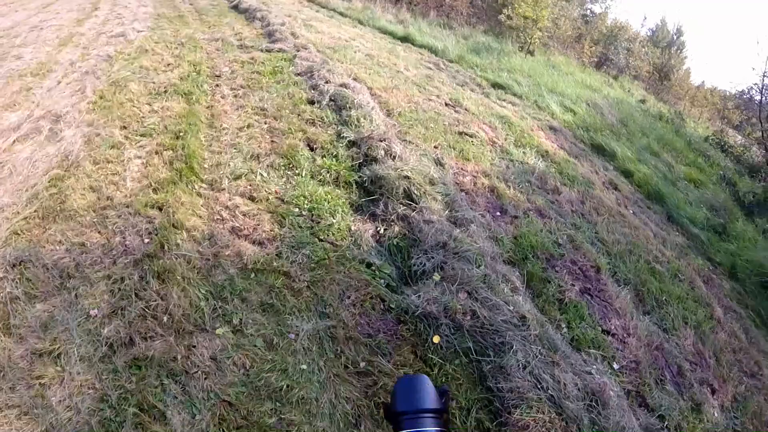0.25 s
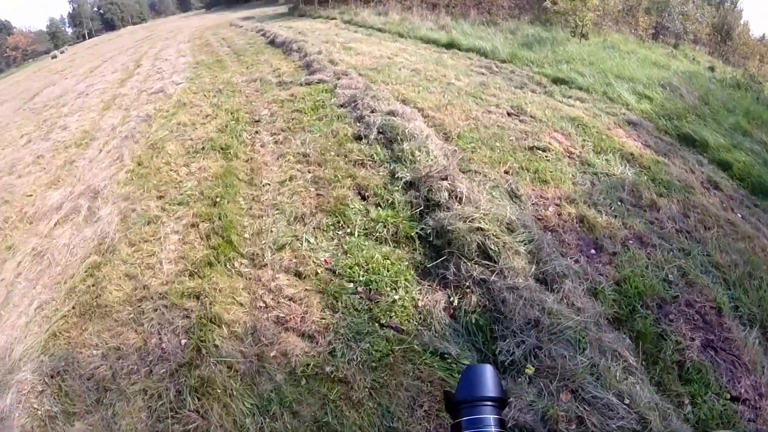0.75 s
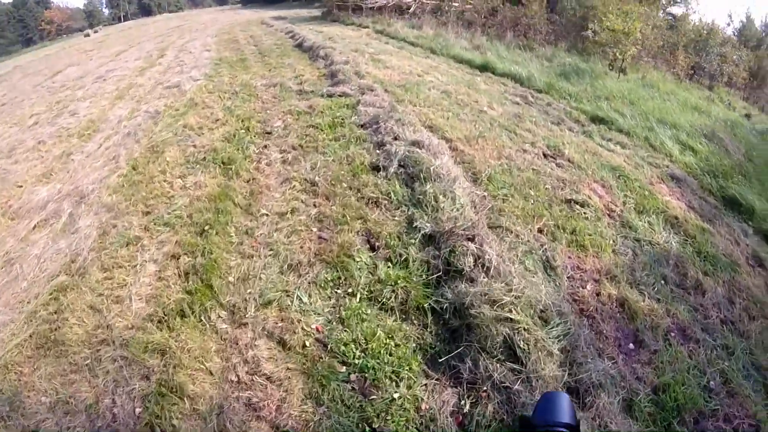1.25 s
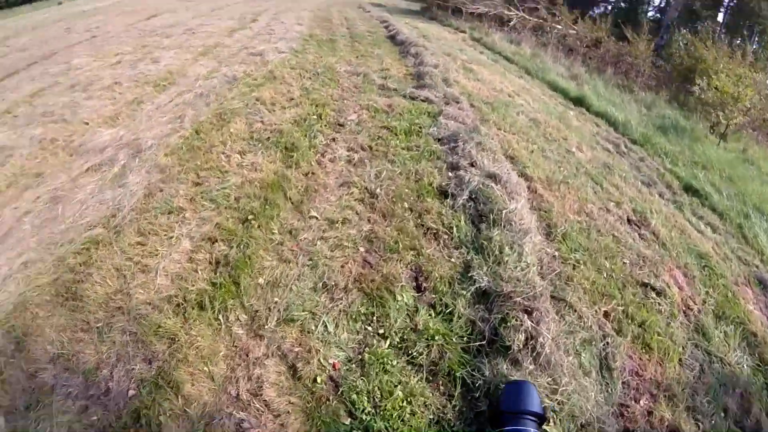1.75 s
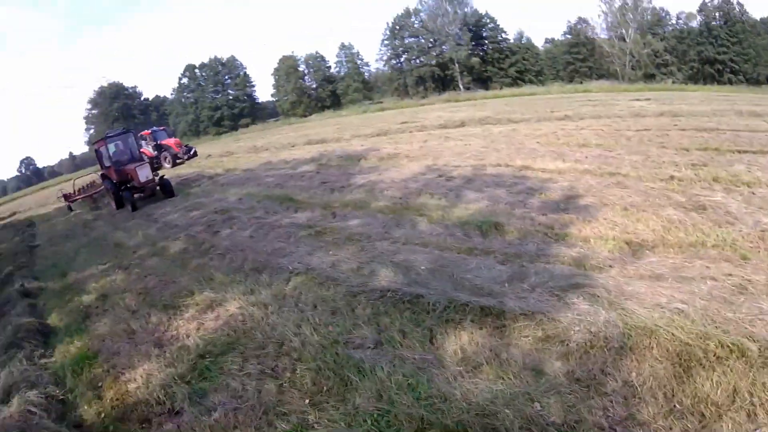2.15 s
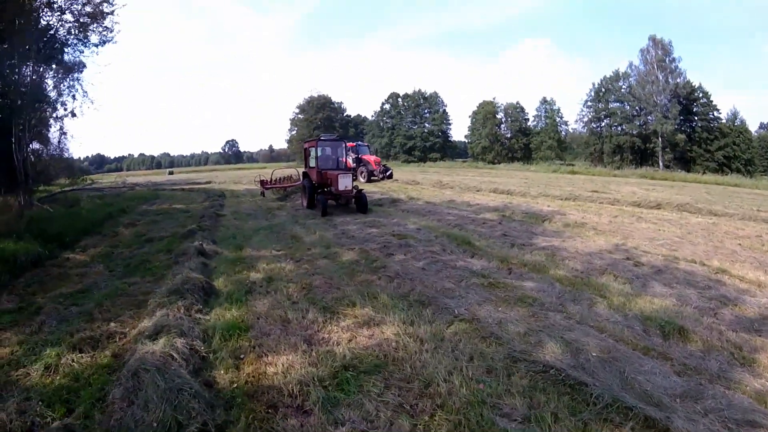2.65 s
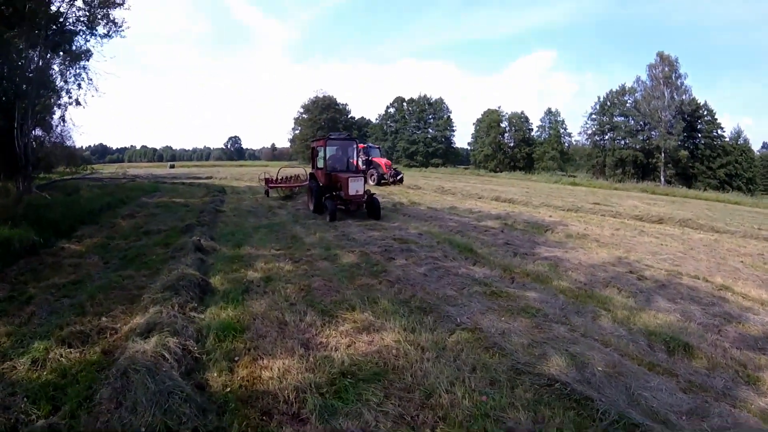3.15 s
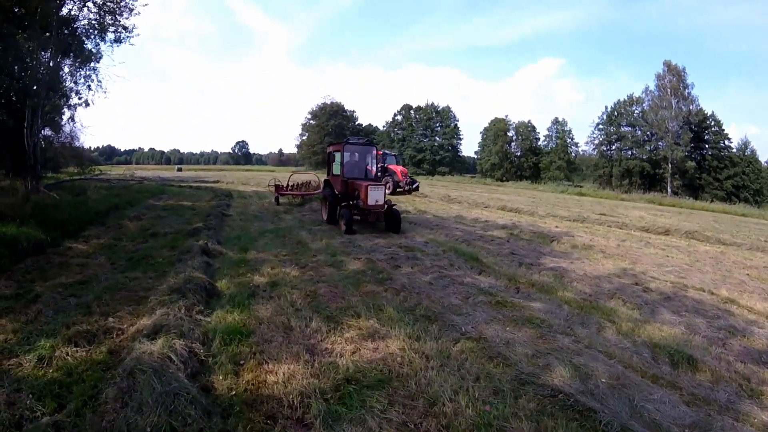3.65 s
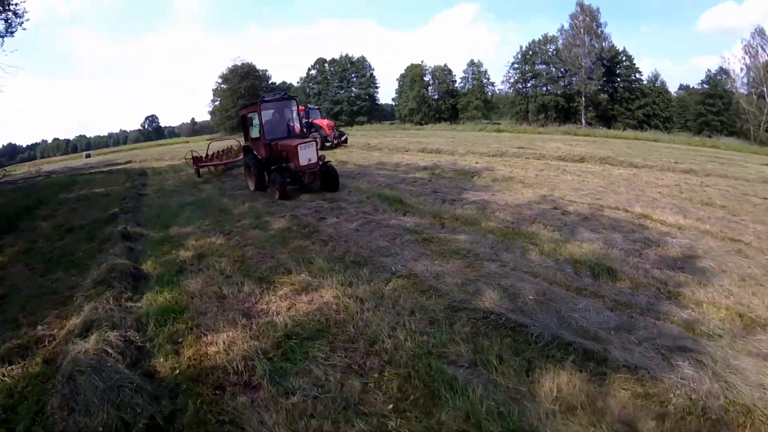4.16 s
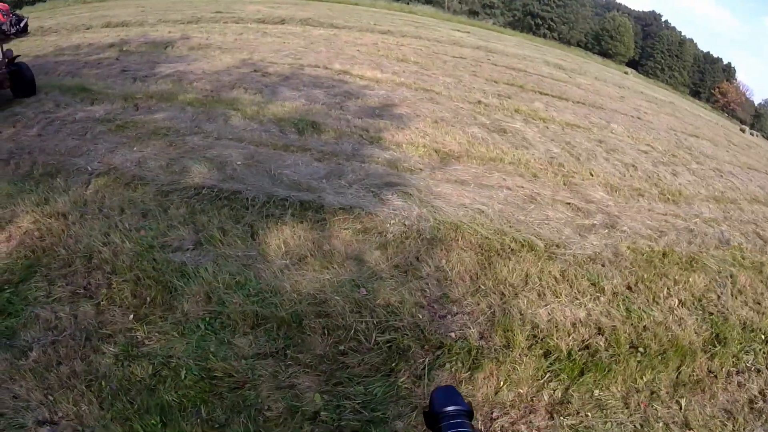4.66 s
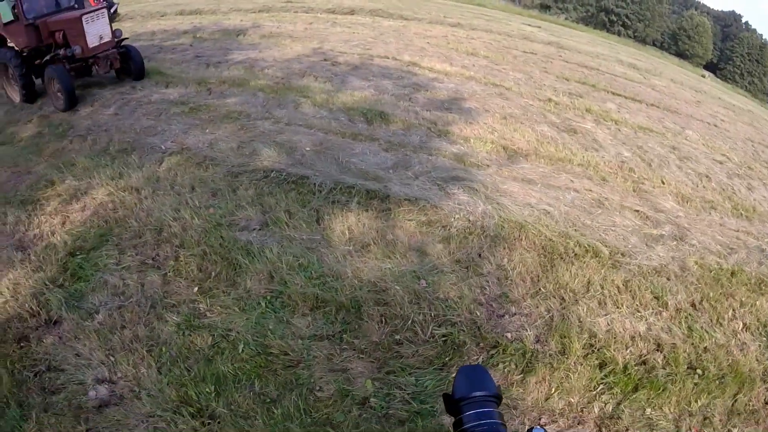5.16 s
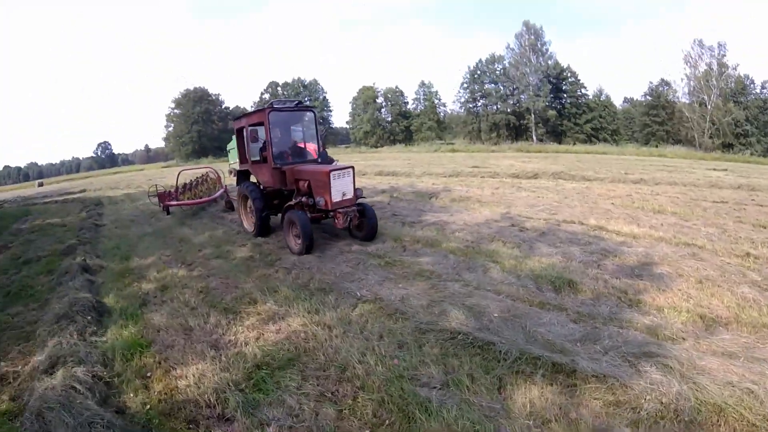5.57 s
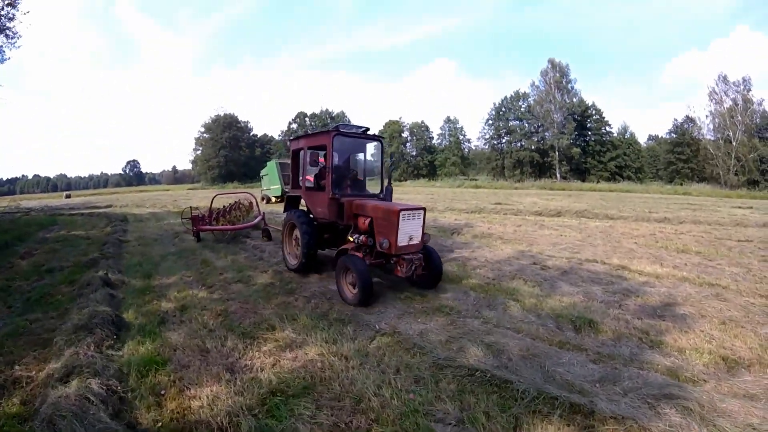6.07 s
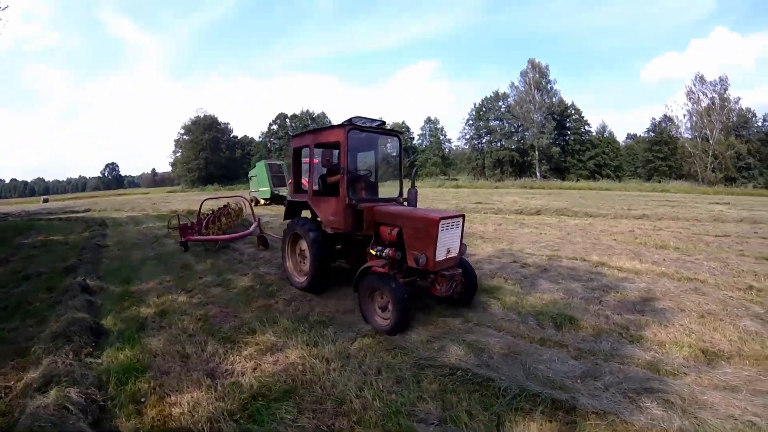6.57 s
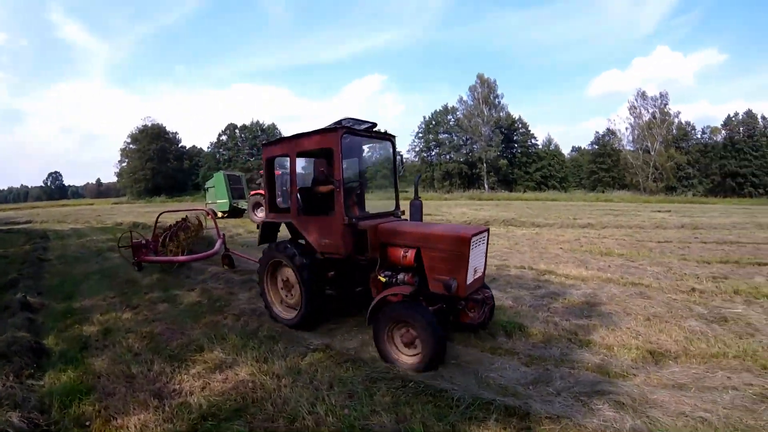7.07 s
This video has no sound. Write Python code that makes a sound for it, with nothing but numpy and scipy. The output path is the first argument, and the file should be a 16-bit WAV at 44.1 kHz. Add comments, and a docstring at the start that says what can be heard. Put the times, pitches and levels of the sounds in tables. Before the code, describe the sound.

Low wind rumble batters a small outdoor microphone, nearly mono and dry. Beneath it an old tractor knocks in a fast limping rhythm: two strong blows close together, then a weaker gap. Hollow block ringing, rattling tinwork, gears and valve ticking join dull exhaust thuds. The engine comes nearer, loudest in the last second, while gusts swell. A short soft hiss comes around three seconds, a fainter one after four.

```python
"""The knocking of an old two-cylinder diesel tractor grows nearer across a meadow, under buffeting wind.
The cylinders fire about a quarter cycle apart: two strong knocks ring the block by modal resonance, two strong
puffs excite the exhaust pipe, then comes a pause with weaker ones. Tinwork, gears and valves rattle as
modulated noise, air hisses out twice, and turbulence rumbles and flutters at a nearly mono microphone."""
import sys
import numpy as np
from scipy import signal
from scipy.fft import rfft, irfft, next_fast_len
from scipy.io import wavfile

SR = 44100
rng = np.random.default_rng(int(sys.argv[2]) if len(sys.argv) > 2 else 0)


def inscribe(sig):
    """Save sig as 16-bit PCM at rate SR to the path in sys.argv[1].

    A 1-D sig is mono; a 2-D sig holds one channel per row.
    Samples are clipped to [-1, 1] before scaling.
    """
    pcm = np.round(np.clip(np.atleast_2d(sig).T, -1, 1) * 32767)
    wavfile.write(sys.argv[1], SR, pcm.astype(np.int16))


N = 322795  # samples

# engine speed: start_s [s], cycle_rate_hz [four-stroke cycles per s]
ENGINE_SPEED = [(0.0, 9.836), (0.73, 9.18), (1.46, 8.546), (2.2, 8.709), (2.93, 8.841), (3.66, 8.82),
                (4.39, 8.944), (5.12, 9.119), (5.86, 9.059), (6.59, 9.432), (7.32, 9.485)]
START_CYCLE = 0.277  # cycles already turned at the start


def crank_cycle():
    """Phase is the time integral of frequency: four-stroke cycles turned so far."""
    return START_CYCLE + np.cumsum(curves(ENGINE_SPEED)[0]) / SR


# engine at the microphone as it nears: start_s [s], block_db [dB], treble_db [dB, base of the treble parts]
ENGINE_LEVEL = [(0, -29, -47), (.7, -29.5, -49.5), (1.4, -29.5, -46.5), (2.05, -30.5, -47.5),
                (2.4, -26, -50), (3.0, -25.5, -48.5), (3.6, -24, -48.5), (4.2, -23.5, -46.5),
                (4.5, -24, -49.5), (4.9, -23.5, -45), (5.85, -26, -48.5), (6.2, -23, -48), (6.67, -19, -42),
                (6.95, -22.5, -44.5), (7.1, -19.5, -40.5), (7.32, -22.5, -42.5)]
# blows in each cycle, over the running noise: place [cycle 0-1], block_db, tinwork_and_gears_db, valves_db [dB]
CYLINDER_BLOWS = [(.735, 9.5, 4, 6.5), (0.03, 6.5, 9, 9.5), (.54, 3, 0, -11), (0.4, 1, 2, -20),
                  (.83, 0, 8.5, -12)]
# spectrum of the block: pitch_hz [Hz], level_db [dB per Hz]
BLOCK_SPECTRUM = [(290, -19), (500, -3.5), (579, -4), (647, -3), (710, 1), (775, -1), (888, 0),
                  (1100, -5.5), (1240, -8), (1360, -12.5), (1600, -43.5), (2080, -68.5), (3520, -120)]
# modes of the block under a blow: pitch_hz [Hz], level_db [dB], t60_s [s]
BLOCK_MODES = [(545, -16, 0.083), (654, -14, 0.085), (715.4, -7, 0.062), (799.6, -7, 0.086),
               (864.5, -4, 0.094), (905.8, -3, 0.047), (1015, -1.5, 0.04), (1054.8, 0, 0.055),
               (1122, -3, .06), (1210, -2.5, 0.023), (1280, -6.5, 0.026), (1401, -14.5, 0.045)]
# short ring of the cylinder head at each blow: pitch_hz [Hz], width_hz [Hz, of each of two passes], level_db [dB]
HEAD_RESONANCES = [(1050, 103, 1), (1155, 127, -3), (921, 117, -5)]
# spectrum of the tinwork: pitch_hz [Hz], level_db [dB per Hz]
TINWORK_SPECTRUM = [(1000, -15), (1500, 3.5), (1900, 3), (2400, 1), (2700, -16), (3200, -31.5)]
# modes of the tinwork: pitch_hz [Hz], level_db [dB], t60_s [s]
TINWORK_MODES = [(1675, -2.5, 0.025), (2114, -15.5, 0.032), (2118, -4.5, 0.019), (2443, -15, 0.031),
                 (2534, -4, 0.02)]
# spectrum of the gears: pitch_hz [Hz], level_db [dB per Hz]
GEAR_SPECTRUM = [(2200, -22), (2700, -2.5), (3200, 1.5), (3700, 0), (4100, -5), (4500, -10), (5200, -41.5)]
# spectrum of the valves: pitch_hz [Hz], level_db [dB per Hz]
VALVE_SPECTRUM = [(3700, -58), (4500, -10), (5200, -4), (5900, -1.5), (7000, -3.5), (8400, -15),
                  (10000, -20.5), (14000, -30), (17000, -43)]
# spectrum of the low growl of the block: pitch_hz [Hz], level_db [dB per Hz]
GROWL_SPECTRUM = [(150, -20), (230, -2), (300, 2.5), (370, 5), (450, 5.5), (600, -31)]
# growl, heard only from near: start_s [s], level_db [dB]
GROWL_GAIN = [(0, -50.5), (4, -39), (6.1, -37), (6.7, -32.5), (7.32, -33.5)]
TINWORK_DB, GEARS_DB, VALVES_DB = 1.5, -3, -3.5  # each against the base treble level
TINWORK_FOLLOWS_BLOCK = 0.43  # share of the block level in the level of the tinwork
RING_DEPTH_DB = 2  # the modes of the block throb more deeply than its broad noise
HEAD_DB = -9  # cylinder head against the rest of the knock


def engine_body(cycle):
    """Impact excitation: each blow shakes block, tinwork, gears and valves together, each by its own amount."""
    blows = [strikes(cycle, row[0], 0, spread_db=2.0, jitter=0.00822) for row in CYLINDER_BLOWS]
    block_blows, tin_blows, valve_blows = (
        sum(gain_of(row[k]) * blow for row, blow in zip(CYLINDER_BLOWS, blows)) for k in range(1, 4))
    block_shake = shaking(block_blows, decay_s=0.0038, flicker_db=0.7)
    tin_shake = shaking(tin_blows, decay_s=0.0061, flicker_db=1.5)
    ring_shake = shaking(gain_of(RING_DEPTH_DB) * block_blows, decay_s=0.011, flicker_db=0.87)

    block_ring = ringing(ring_shake, block_blows, BLOCK_MODES, blow_db=-3.5)
    block_noise = evened(coloured(block_shake, BLOCK_SPECTRUM))
    head = sum(gain_of(db) * resonate(resonate(block_blows, hz, width), hz, width)
               for hz, width, db in HEAD_RESONANCES)
    knock = evened(block_ring + gain_of(0.8) * block_noise) + gain_of(HEAD_DB) * evened(head)

    tin_ring = ringing(tin_shake, tin_blows, TINWORK_MODES, blow_db=-8.5)
    clatter = tin_ring + gain_of(5.0) * evened(coloured(tin_shake, TINWORK_SPECTRUM))
    gears = coloured(tin_shake, GEAR_SPECTRUM)
    valves = coloured(shaking(valve_blows, decay_s=0.008, flicker_db=1.52), VALVE_SPECTRUM)
    growl = coloured(shaking(block_blows, decay_s=0.03, flicker_db=0.83), GROWL_SPECTRUM)

    block_db, treble_db = curves(ENGINE_LEVEL)
    block_over_treble = block_db - treble_db
    tin_db = treble_db + TINWORK_DB + TINWORK_FOLLOWS_BLOCK * (block_over_treble - np.mean(block_over_treble))
    parts = knock, clatter, gears, valves, growl
    levels = block_db, tin_db, treble_db + GEARS_DB, treble_db + VALVES_DB, curves(GROWL_GAIN)[0]
    return sum(gain_of(db) * evened(part) for db, part in zip(levels, parts))


def strikes(cycle, place, db, spread_db, jitter):
    """Quasi-periodic impulses: one click a cycle at this place, varying in size and time (jitter in cycles)."""
    luck = rng.standard_normal((int(cycle[-1]) + 1, 2))
    at = np.searchsorted(cycle, np.arange(len(luck)) + place + jitter * luck[:, 0])
    out = np.zeros(N + 1)
    out[at] = gain_of(db + spread_db * luck[:, 1])
    out[0] = 0  # clicks due before the start land here; those due after the end land on sample N
    return out[:N]


def shaking(clicks, decay_s, flicker_db):
    """Amplitude modulation: noise of moving metal whose power swells at each blow and dies away."""
    t = np.arange(SR // 4) / SR
    swell = (1 - np.exp(-t / 0.0033)) * np.exp(-t / decay_s)
    power = 1 + signal.oaconvolve(clicks ** 2, swell)[:N]
    return np.sqrt(power) * gain_of(flicker_db * wander(100)) * rng.standard_normal(N)


def ringing(shake, clicks, modes, blow_db):
    """Modal superposition: shaking and blows set damped modes going; heavy metal takes a moment to speak."""
    t = np.arange(SR // 6) / SR
    ring = sum(gain_of(db - 60 * t / t60) * np.sin(2 * np.pi * hz * t) for hz, db, t60 in modes)
    ring = ring * (1 - np.exp(-t / 0.0014)) ** 2
    drive = evened(shake) + gain_of(blow_db) * evened(clicks)
    rung = signal.oaconvolve(drive, ring)[:N]
    now = np.arange(N)
    # the ring wavers slightly in pitch: a changing delay of 0.684 ms rms
    delay = 0.000684 * SR * wander(4.96)
    return evened(np.interp(now + delay, now, rung))


# exhaust puffs: place [cycle 0-1], level_db [dB]
EXHAUST_PUFFS = [(0.058, -4), (.31, -4), (0.559, -19), (0.811, -15.5)]
# resonances of the pipe: pitch_hz [Hz], width_hz [Hz], level_db [dB]
PIPE_RESONANCES = [(35, 57, 4.5), (71, 33, 6), (108, 34, -18)]
# exhaust as heard: start_s [s], level_db [dB]
EXHAUST_LEVEL = [(0, -29.5), (2, -22), (4.5, -24.5), (7.32, -24)]


def exhaust(cycle):
    """Pipe resonance: soft pressure puffs excite the air column."""
    puffs = sum(strikes(cycle, place, db, spread_db=1.0, jitter=0.012) for place, db in EXHAUST_PUFFS)
    pipe = sum(gain_of(db) * resonate(puffs, hz, width) for hz, width, db in PIPE_RESONANCES)
    soft = signal.oaconvolve(pipe, signal.windows.hann(SR // 200))[:N]  # 5 ms smoothing
    return gain_of(curves(EXHAUST_LEVEL)[0]) * evened(soft)


# short hisses of escaping air: start_s [s], level_db [dB], t60_s [s]
AIR_HISSES = [(3.052, -35.5, 0.64), (4.34, -37.5, 0.17)]
# their spectrum: pitch_hz [Hz], level_db [dB per Hz]
HISS_SPECTRUM = [(2500, -27), (3700, -4), (4500, -16.5), (5900, -1.5), (7200, -8.5), (8400, -13),
                 (11000, -38)]


def hisses():
    """Jet noise with exponential decay: air starts sharply and bleeds away."""
    t = np.arange(N) / SR
    level = sum((t > s) * gain_of(db - 60 * np.maximum(t - s, 0) / t60) for s, db, t60 in AIR_HISSES)
    return level * evened(coloured(rng.standard_normal(N), HISS_SPECTRUM))


# changing wind on the microphone: start_s [s], rumble_db [dB]
CHANGING_WIND = [(0, -21.5), (.3, -21), (.85, -21), (1.35, -22), (2.04, -25), (2.12, -16), (2.6, -17.5),
                 (3.1, -15.5), (3.4, -17.5), (3.85, -20.5), (4.1, -19.5), (4.4, -14), (4.78, -17.5),
                 (5.2, -15), (5.97, -15.5), (6.4, -15), (6.7, -10.5), (7.32, -14.5)]
# gusts on top of it: peak_s [s], length_s [s], rumble_db [dB], flutter_db [dB]
WIND_GUSTS = [(0.232, 0.07, -18, -68), (0.575, 0.32, -24, -30.5), (1.04, 0.24, -20, -32.5),
              (1.178, 0.12, -13.5, -39), (1.548, .2, -22, -33.5), (1.674, 0.59, -15.5, -31.5),
              (2.156, 0.21, -12.5, -28), (2.285, 0.26, -19, -18), (2.73, 0.062, -9.5, -31),
              (2.966, 0.1, -9.5, -27), (4.18, 0.17, -16, -34), (4.429, 0.15, -9.5, -28),
              (4.639, .15, -25.5, -25.5), (4.991, 0.17, -8, -15), (5.106, 0.081, -10, -27),
              (5.441, 0.45, -20, -15.5), (5.73, 0.32, -8.5, -18.5), (5.905, 0.18, -27, -24),
              (6.136, 0.33, -19, -26.5), (7.32, 0.35, -11, -13)]
# spectrum of the rumble: pitch_hz [Hz], level_db [dB per Hz]
RUMBLE_SPECTRUM = [(0, -19), (8, -7.5), (20, 3.5), (48, 3), (82, -1), (130, -7), (170, -32.5), (290, -114)]
# spectrum of the flutter: pitch_hz [Hz], level_db [dB per Hz]
FLUTTER_SPECTRUM = [(70, -25.5), (110, -1.5), (150, 1.5), (220, -5), (330, -9), (500, -16.5), (800, -21.5),
                    (1500, -62)]
FLUTTER_DB, MEAN_WIND_DB = -30.5, -19  # flutter level when the underlying rumble is at the mean
FLUTTER_SLOPE = 1.52  # dB per dB: flutter grows faster than the rumble
LUMPS_DB, LUMPS_HZ = 1.42, 13.6  # rms depth and top rate of the unevenness


def wind():
    """Turbulent pressure: lumpy rumble, and higher flutter as eddies pass the port; gust powers add."""
    t, underlying_db = np.arange(N) / SR, curves(CHANGING_WIND)[0]
    rumble_db = underlying_db + LUMPS_DB * wander(LUMPS_HZ)
    flutter_db = FLUTTER_DB + FLUTTER_SLOPE * (underlying_db - MEAN_WIND_DB) + LUMPS_DB * wander(LUMPS_HZ)
    rumble_power, flutter_power = gain_of(2 * rumble_db), gain_of(2 * flutter_db)
    for peak_s, length_s, gust_rumble_db, gust_flutter_db in WIND_GUSTS:
        swell = np.cos(np.pi * np.clip((t - peak_s) / length_s, -.5, .5)) ** 4
        rumble_power = rumble_power + gain_of(2 * gust_rumble_db) * swell
        flutter_power = flutter_power + gain_of(2 * gust_flutter_db) * swell
    eddies = wander(25)  # shared by both, scaled to dB below
    rumble = evened(coloured(gain_of(1.02 * eddies) * rng.standard_normal(N), RUMBLE_SPECTRUM))
    flutter = evened(coloured(gain_of(1.52 * eddies) * rng.standard_normal(N), FLUTTER_SPECTRUM))
    return np.sqrt(rumble_power) * rumble + np.sqrt(flutter_power) * flutter


def gain_of(db):
    """Logarithmic level: decibels to an amplitude factor."""
    return 10 ** (np.asarray(db) / 20)


def evened(x):
    """Power normalisation: scales to rms 1."""
    return x / np.sqrt(np.mean(x ** 2) + 1e-20)


def curves(rows):
    """Linear interpolation: the columns of a table after the time, one value a sample."""
    s, *columns = np.transpose(rows)
    return [np.interp(np.arange(N) / SR, s, c) for c in columns]


def coloured(x, points):
    """Linear filtering: shapes x by a spectrum, without phase shift."""
    f, db = np.transpose(points)
    size = next_fast_len(N)
    hz = np.fft.rfftfreq(size, 1 / SR)
    gain = gain_of(np.interp(np.log(hz + 1), np.log(f + 1), db))
    return irfft(rfft(x, size) * gain, size)[:N]


def wander(rate_hz):
    """Low-passed random process: slow chance of rms 1."""
    low_pass = signal.butter(2, rate_hz, fs=SR, output="sos")
    return evened(signal.sosfilt(low_pass, rng.standard_normal(N)))


def resonate(x, hz, width):
    """Damped oscillator: one resonance of gain 1."""
    pole = np.exp((2j * np.pi * hz - np.pi * width) / SR)
    return 2 * signal.lfilter([1 - abs(pole)], [1, -pole], x).real


# base threshold under which faint treble drops out: pitch_hz [Hz], threshold_db [dB in one bin]
FAINT_THRESHOLD = [(2000, -103), (3000, -86), (4600, -86.5), (6000, -83.5), (8000, -86.5), (10000, -86),
                   (14000, -81.5)]


def dropouts(x):
    """Threshold gating: faint treble falls silent in patches; louder sound at the low end raises the bar."""
    hz, _, z = signal.stft(x, SR, window="cosine", nperseg=2048, noverlap=1024)
    power = abs(z) ** 2
    loud_db = 10 * np.log10(power[:64].mean(0) + 1e-12)  # below about 1.4 kHz
    bands = np.arange(len(hz)) // 24
    band_power = np.add.reduceat(power, np.arange(0, len(hz), 24)) / 24
    band_db = 10 * np.log10(band_power + 1e-14)[bands]
    frame_mood_db = 4.9 * rng.standard_normal(z.shape[1])
    band_mood_db = 3.0 * rng.standard_normal((bands[-1] + 1, z.shape[1]))[bands]
    base_db = np.interp(hz, *np.transpose(FAINT_THRESHOLD), left=-300)[:, None]
    bar_db = base_db + 0.89 * (loud_db + 38.0) + frame_mood_db + band_mood_db
    keep = (band_db > bar_db) & (power > gain_of(2 * (bar_db - 4)))
    return signal.istft(z * keep, SR, window="cosine", nperseg=2048, noverlap=1024)[1][:N]


def scene():
    """Superposition: all sources add and reach both channels alike."""
    cycle = crank_cycle()
    return np.tile(engine_body(cycle) + exhaust(cycle) + wind() + hisses(), (2, 1))


def top_cut(x):
    """Nothing passes above the cut-off."""
    return signal.sosfilt(signal.butter(12, 14800, fs=SR, output="sos"), x)


# what the right channel gains and the left loses: pitch_hz [Hz], level_db [dB against the mono sound]
RIGHTWARD_LEAN = [(100, -61.5), (310, -40.5), (530, -30.5), (950, -22.5), (1400, -21.5), (3000, -24),
                  (7000, -26.5), (12000, -39)]


def record(dry):
    """Soft saturation rounds the peaks; the right channel is a little more sensitive above the bass."""
    mono = dropouts(0.96 * np.tanh(dry[0] / 1.106))
    lean = coloured(mono, RIGHTWARD_LEAN)
    return top_cut(np.array([mono - lean, mono + lean]))


dry = scene()
out = record(dry)
inscribe(out)
```